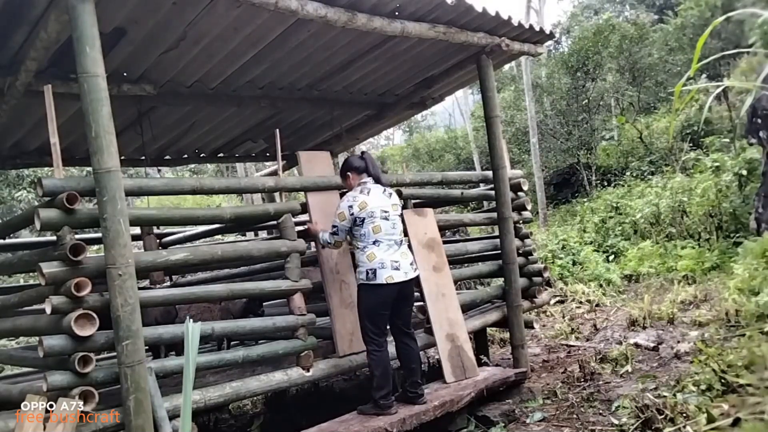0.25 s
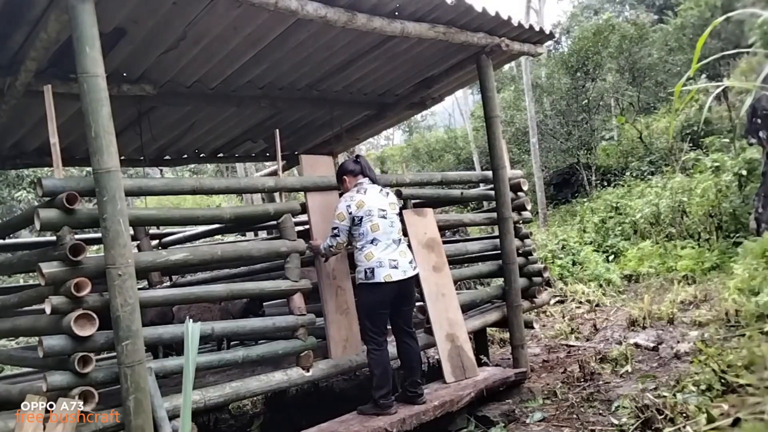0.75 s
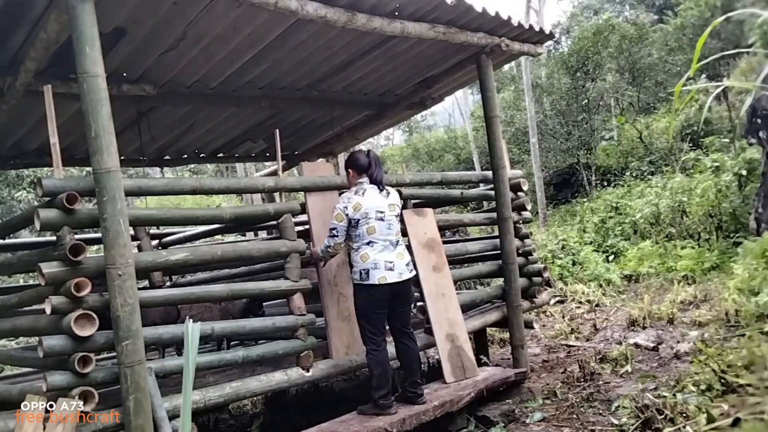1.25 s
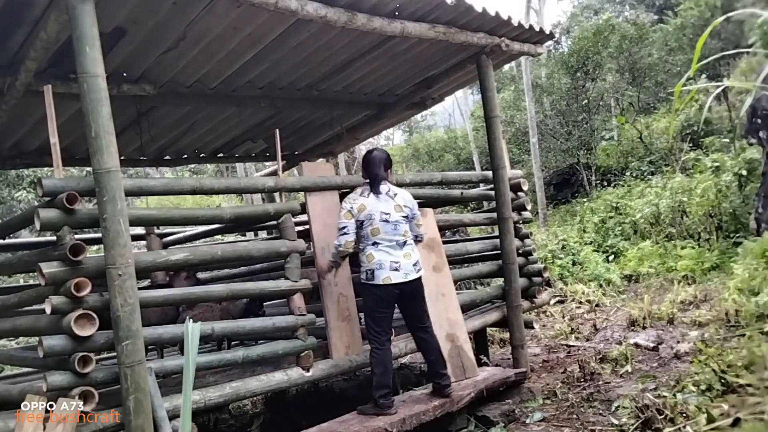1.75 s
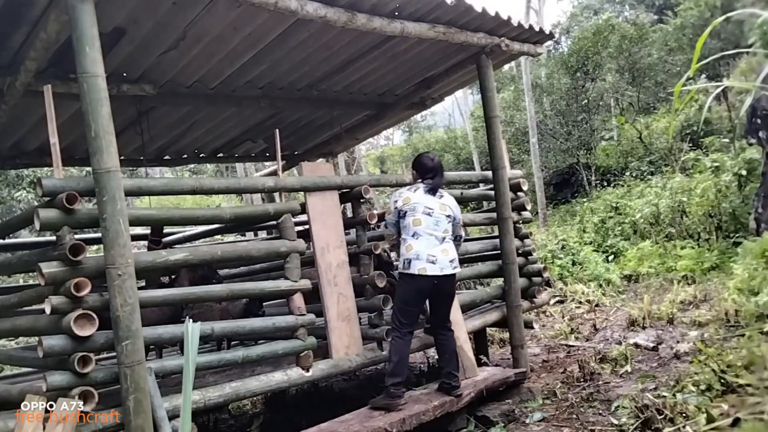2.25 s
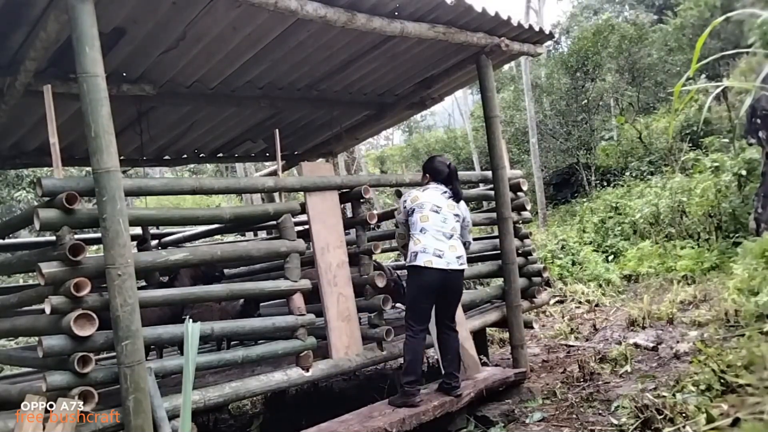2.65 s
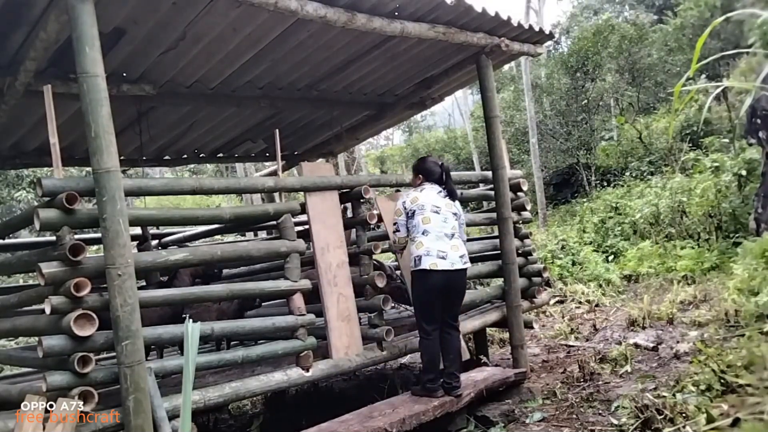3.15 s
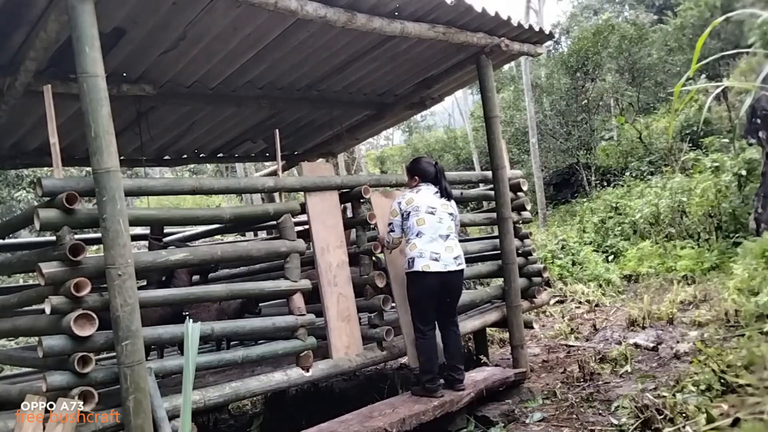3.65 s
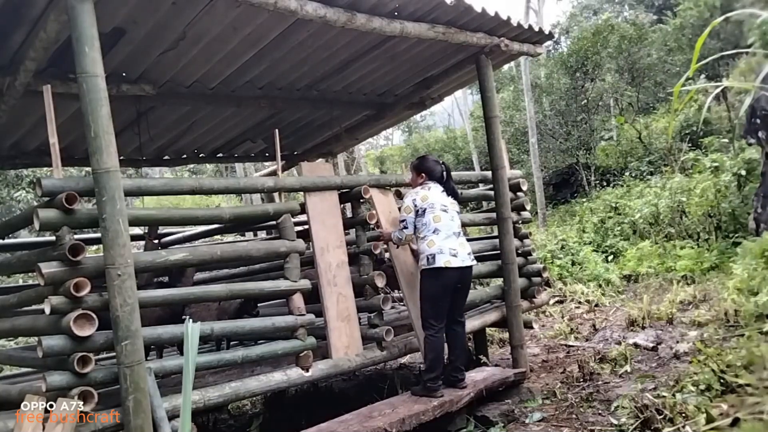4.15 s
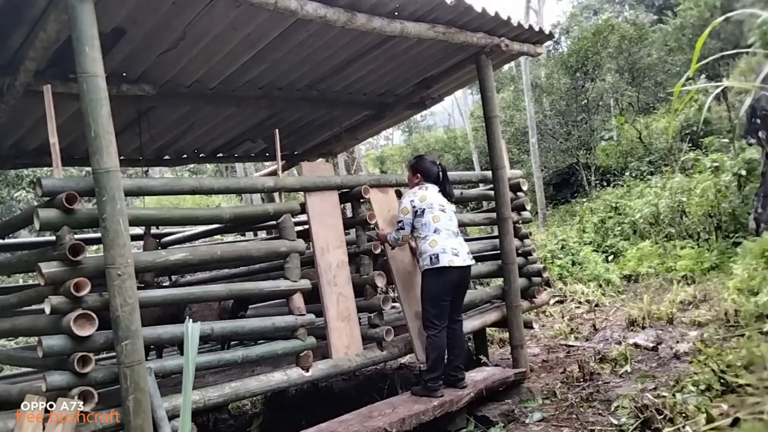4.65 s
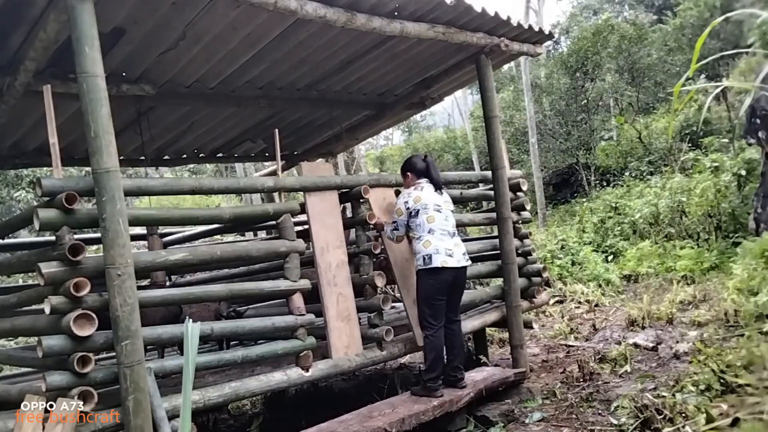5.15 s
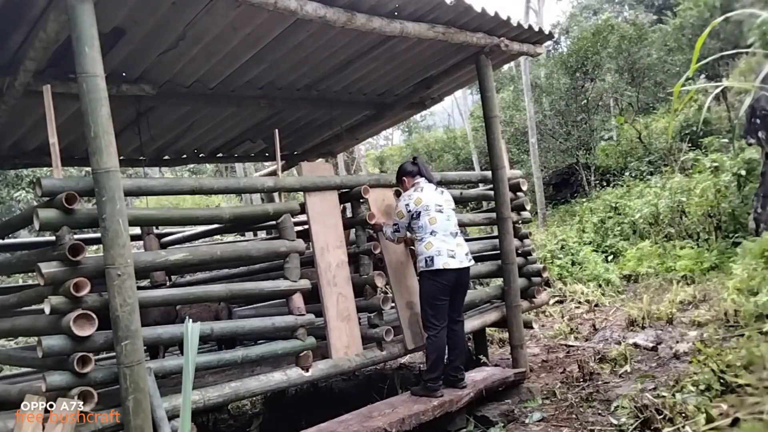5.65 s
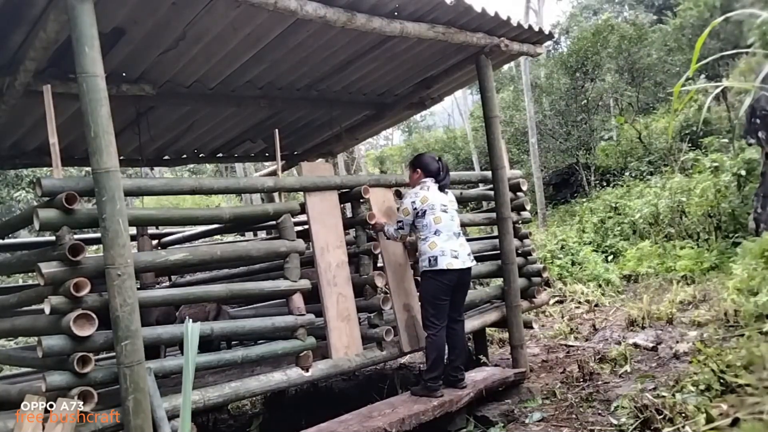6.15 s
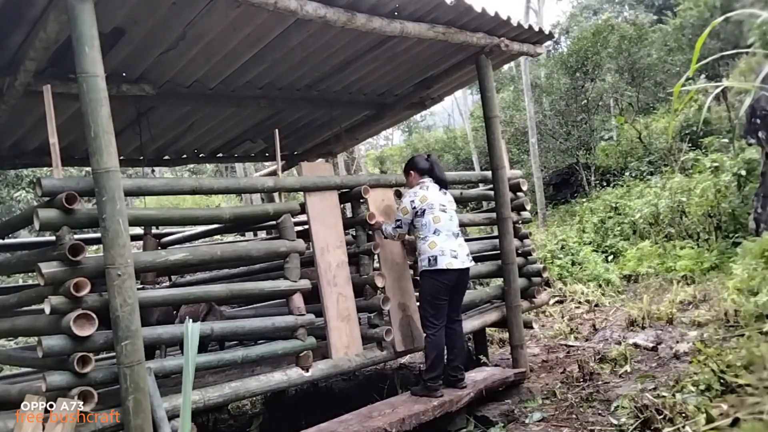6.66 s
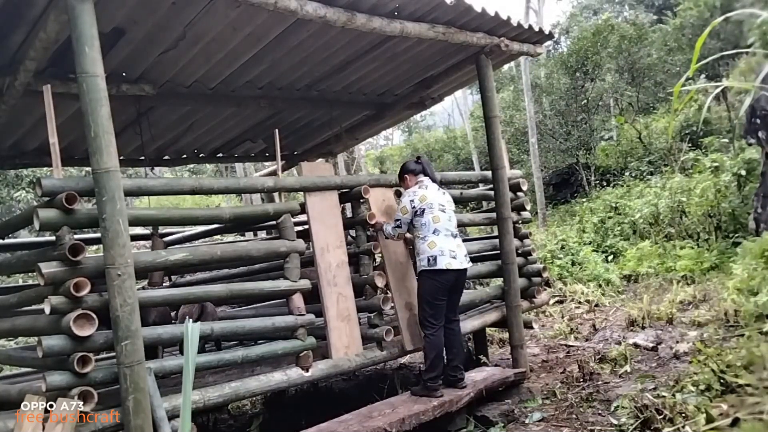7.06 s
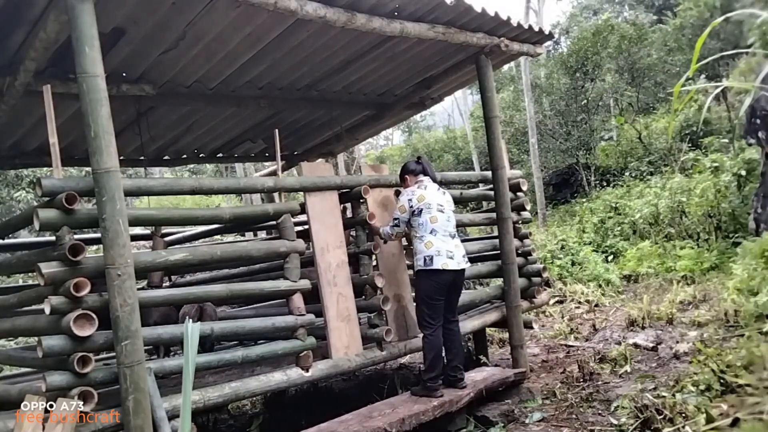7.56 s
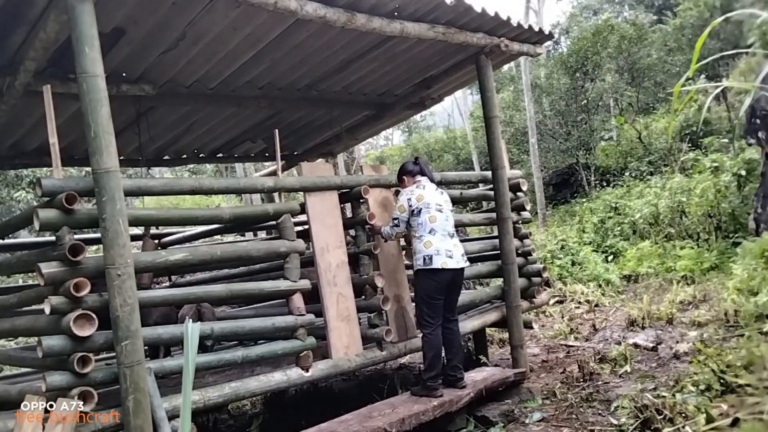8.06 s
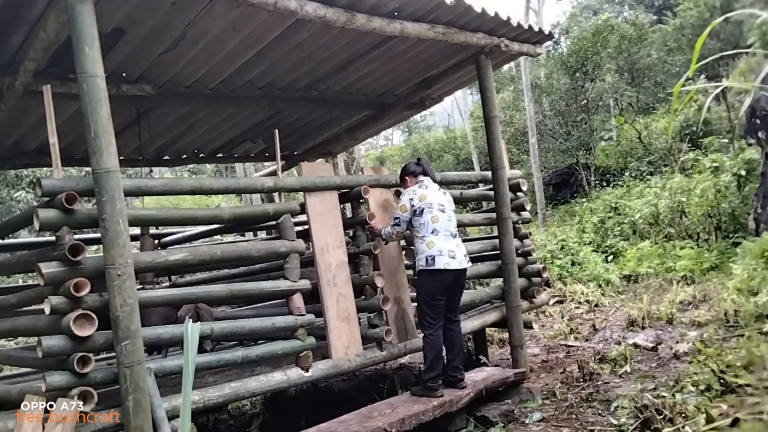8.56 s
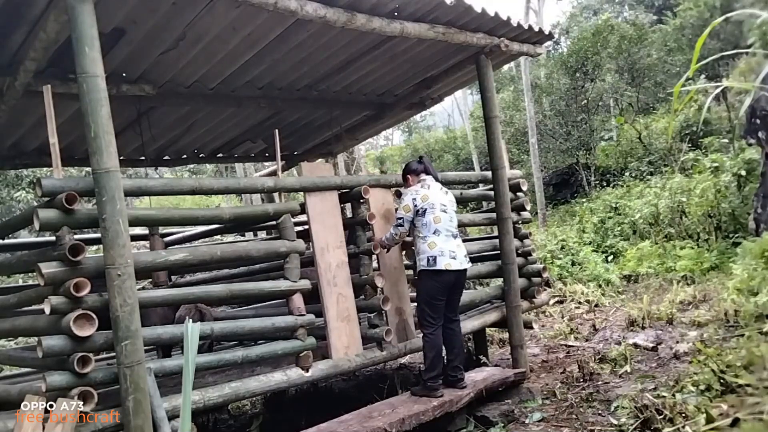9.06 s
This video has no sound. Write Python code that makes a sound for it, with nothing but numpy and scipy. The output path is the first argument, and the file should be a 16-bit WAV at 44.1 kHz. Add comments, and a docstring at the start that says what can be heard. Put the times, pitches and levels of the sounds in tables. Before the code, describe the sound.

A plank bangs hard on a hollow bamboo pen in a quick opening cluster, then near quiet with sparse light taps. Small metal animal bells clank around two to three and a half seconds. Moderate knocks return from about five seconds, busiest near six and a half, with a few lower bell notes after seven. Close stereo pickup outdoors under a sheet roof, very faint forest hush, momentary dropouts about three times a second.

```python
"""Wooden knocks come first, close by: planks lifted, slid and knocked against the poles of a bamboo goat pen,
each blow a noise burst through plank and hollow-pole resonators. Small metal bells on the goats' necks clank as
sums of decaying modes. Feet and clothes rustle in filtered noise under a sheet roof of feedback delays, at the
edge of a forest whose hush is faint shaped noise. Two close, unlike microphone ports pick it up, and the sound
cuts out for a moment about three times a second."""
import sys
import numpy as np
from scipy import signal
from scipy.fft import rfft, irfft, next_fast_len
from scipy.io import wavfile
from scipy.ndimage import uniform_filter1d

SR = 44100
rng = np.random.default_rng(int(sys.argv[2]) if len(sys.argv) > 2 else 0)


def to_linear_factor(level_db):
    """Convert decibel levels (scalar or array-like) to linear amplitude factors."""
    exponent = np.asarray(level_db, float) / 20
    return 10 ** exponent


def transcribe(u):
    """Save the signal u as a 16-bit wav file named by the first command-line argument.

    u: samples, shape (n,) or (channels, n), limited to [-1, 1]; the rate is SR.
    q: integer samples, one column per channel.
    """
    v = np.clip(np.atleast_2d(u).T, -1, 1)
    q = np.round(v * 32767).astype(np.int16)
    wavfile.write(sys.argv[1], SR, q)


N = 410130   # samples

# Wood on bamboo. Each row: start in seconds, body level in dB, crack level in dB, nominal t60 in seconds,
# centre in Hz.
KNOCKS = [(0.039, -12, -61, 0.12, 550), (0.045, -12, -31.5, 0.14, 587), (0.056, -21.5, -43.5, 0.1, 526),
          (0.1224, -12.5, -31, 0.08, 580), (.13, -14, -34, 0.1, 1030), (0.179, -28.5, -35, 0.2, 550),
          (0.423, -45, -52, 0.27, 980), (0.59, -38, -59, 0.13, 504), (0.797, -53.5, -56.5, 0.23, 542),
          (1.074, -38, -55, 0.27, 499), (1.231, -51, -60, 0.11, 1230), (1.657, -52.5, -54.5, 0.62, 796),
          (1.784, -63.5, -47, 0.3, 2060), (1.809, -37.5, -48.5, 0.36, 1024), (2.54, -50.5, -56, 0.33, 870),
          (2.763, -48, -95, 0.71, 1364), (2.813, -37, -51, 0.27, 1350), (2.913, -43.5, -50, 0.36, 1310),
          (3.528, -49, -57.5, 0.53, 507), (4.016, -51.5, -59.5, 0.16, 1363), (4.059, -51, -57, 0.37, 706),
          (4.236, -43.5, -50.5, 0.15, 1255), (4.561, -56, -65, 0.18, 630), (4.76, -49, -66, 0.18, 477),
          (4.909, -78, -63.5, 0.17, 980), (4.953, -31, -48, 0.19, 494), (5.278, -45.5, -62, 0.48, 947),
          (5.361, -26.5, -52.5, 0.2, 480), (5.529, -44, -69, 0.26, 593), (5.58, -30, -28.5, 0.09, 1730),
          (5.59, -26, -58, 0.13, 750), (6.292, -47.5, -58, 0.35, 465), (6.508, -38.5, -75, 0.13, 1370),
          (6.666, -30, -51.5, 0.17, 2080), (6.695, -39, -74, 0.072, 1900), (6.713, -26, -78, 0.1, 486),
          (6.725, -26.5, -77, 0.29, 460), (6.744, -28, -44, 0.14, 2750), (6.836, -44.5, -48.5, 0.54, 415),
          (7.189, -43, -70, 0.76, 370), (7.527, -31.5, -54.5, 0.13, 400), (7.639, -32.5, -64, 0.093, 408),
          (7.938, -40.5, -55, 0.56, 840), (8.202, -60, -56, 0.94, 796), (8.366, -45, -53, 0.15, 867),
          (8.595, -53, -66.5, 0.1, 428), (8.706, -49.5, -59.5, 0.12, 748), (8.818, -43, -60, 0.11, 1050),
          (8.909, -40, -67, 0.14, 446), (9.044, -42, -78, 0.31, 650), (9.134, -46.5, -59, .1, 3000),
          (9.152, -48, -51.5, 0.098, 1380), (9.272, -55, -56, 0.18, 900)]
# Modes of planks and poles. Each row: centre in Hz, width in Hz, level in dB.
WOOD = [(356.7, 42, 0), (465, 24, 3), (587, 41, 3), (765, 37, -1.5), (928, 60, 1), (1220, 320, -10.5),
        (1345, 56, 0.5), (1710, 600, -6.5), (2080, 420, -5.5), (2620, 260, -9.5), (3010, 260, -11.5)]
# Boom of the hollow poles. Each row: centre in Hz, width in Hz, level in dB.
HOLLOW = [(84, 32, -11), (128, 38, 0.5), (168.1, 36, 3), (197, 33, 4.5), (250, 76, -3)]
# Feet and hooves on the pole floor. Each row: start in seconds, level in dB, nominal t60 in seconds.
THUMPS = [(0.036, -24.5, 0.09), (1.076, -41, 0.076), (1.248, -40.5, 0.28), (1.783, -48, 0.24),
          (3.901, -63, 0.2), (6.304, -51, 0.26), (7.187, -38.5, 0.18), (7.527, -44, 0.26),
          (9.042, -39.5, 0.25)]
# Light scuffs heard only in the treble. Each row: start in seconds, level in dB, t60 in seconds.
SCUFFS = [(.798, -41.5, 0.1), (1.115, -45, 0.091), (3.714, -50, 0.18), (5.82, -42, 0.037),
          (5.874, -45.5, 0.18), (6.53, -46, 0.33), (6.851, -44, 0.11)]
# Clapper strokes on the small and the large bell. Each row: start in seconds, low height in dB, high height
# in dB, place on the rim in degrees, ring share of the free decay.
SMALL_STROKES = [(1.314, -24.5, -28, 105, 0.38), (1.83, -40.5, -41.5, 39, 0.55),
                 (2.207, -35.5, -87.5, 33, 0.1), (2.27, -24.5, -19, 34, 0.18),
                 (2.298, -16.5, -19.5, 47, 0.15), (2.483, -34.5, -38.5, 38, 0.24),
                 (2.508, -39, -32, 82, 0.2), (2.606, -44, -52, 45, 0.19), (2.781, -39, -50, 56, 0.33),
                 (2.835, -36.5, -27.5, 12, 0.46), (2.925, -50, -29, 26, 0.45),
                 (3.316, -41, -57.5, 46, 0.18), (3.491, -34.5, -22.5, 2.5, 0.25), (3.52, -46, -42, 11, 0.4),
                 (6.407, -32, -29, 5.5, 0.5), (6.731, -30, -26.5, 80, 0.36),
                 (9.058, -37.5, -32.5, 27, 0.41)]
LARGE_STROKES = [(.909, -43.5, -38, 42, 0.48), (7.292, -45.5, -21, 32.3, 0.68),
                 (7.41, -40, -24.5, 57, 0.91)]
# What drives each mode family. Each row: the low, high or greater (either) height, or the high height along or
# across the struck place; level in dB.
SMALL_DRIVE = [("low", 0), ("either", -20.5), ("high", -5.5), ("along", 0), ("across", 0), ("high", -10.5)]
LARGE_DRIVE = [("low", 0), ("low", -3.5), ("high", -7.5), ("along", 0), ("across", 0), ("high", -22),
               ("low", 2)]
# A small-bell stroke with other modes sounding, strokes on a tiny bell, a faint metallic squeak and a hollow
# pole left ringing. Each row: start in seconds, height in dB, ring share of the free decay.
OTHER_MODES_STROKES = [(6.865, -37, 0.98)]
TINY_STROKES = [(6.308, -54, 1), (6.337, -36.5, 0.72)]
SQUEAK_STROKES = [(2.44, -48.5, 0.5), (6.335, -51, 0.85)]
POLE_STROKES = [(7.995, -49, 0.88)]
# Modes of each ringing thing, one list a family. Each row: pitch in Hz, level in dB, free t60 in seconds.
SMALL_BELL = [
    [(1427, -2, 1.3), (1385, -2, .3)],
    [(3790, 0, .5), (3720, -3, .4)],
    [(7063, 0, .34), (11350, -5, .24), (11700, -5, .24), (14560, -5, .26), (15600, -14, .2)],
    [(8545, -1, .34), (8475, -8, .18), (13310, -17, .25)],
    [(9190, 0, .36), (9305, -9, .28), (12960, -11, .2)],
    [(9635, -2, .3), (9800, -3, .3)],
]
LARGE_BELL = [
    [(759, -1, 1.15), (955, -2, .1)],
    [(2056, -2, .75), (5066, 3.5, .42)],
    [(5631, 0, .24), (5819, -1, .24), (6185, -8, .2), (7779, -10, .15), (11340, -12, .2)],
    [(7437, 0, .22), (7224, -6, .17), (8290, -5, .22), (8760, -5, .18), (12800, -2, .11), (14720, -1, .09),
     (14250, -10, .17), (15150, -9, .18)],
    [(9884, 0, .15), (9324, -10, .13), (10420, -6, .13), (12370, -4, .15), (13100, -3, .1),
     (11820, -9, .12), (10940, -12, .15)],
    [(3860, 1, .5), (3290, -4, .2), (2660, -5, .14), (6810, 2, .12)],
    [(9065, 0, .2), (8790, -1, .2)],
]
SMALL_BELL_OTHER_MODES = [
    [(7144, -2, .3), (7181, -2, .25), (3833, -12, .3), (1427, -21, .9), (8936, -11, .2), (9119, -15, .25),
     (9636, -10, .25), (9760, -5, .25), (11480, -10, .15), (13870, -13, .2)],
]
TINY_BELL = [
    [(9168, 0, .14), (6772, -10, .17), (7181, -11, .15), (14230, -13, .08), (14780, -15, .1),
     (11260, -14, .15), (13300, -12, .1)],
]
SQUEAK = [
    [(2480, 0, .2), (5830, -8, .25)],
]
POLE = [
    [(468, -2, 0.6), (600, -6, .25), (877, -8, 0.37)],
]
# Shuffling and sliding. Each row: time in seconds, low rub level in dB, bright rustle level in dB.
RUSTLE = [(0.058, -26.5, -37), (0.16, -52, -63), (0.6, -70, -70.5), (1.27, -60, -62.5), (1.52, -74, -73.5),
          (2.79, -70.5, -67.5), (3.943, -75.5, -79), (4.1, -75, -70), (4.56, -80, -83),
          (5.31, -64.5, -68.5), (5.52, -54.5, -60), (5.67, -69, -66.5), (6.03, -74.5, -82),
          (6.289, -79, -73), (6.491, -69, -59.5), (6.848, -59, -89), (6.98, -65.5, -76.5),
          (7.24, -72.5, -65), (7.39, -62, -56.5), (7.52, -57, -70.5), (7.729, -72.5, -70.5),
          (8.191, -69.5, -68), (8.48, -78.5, -79), (9.02, -70.5, -67), (9.3, -65.5, -63.5)]
# Noise spectra of rub, bright rustle and forest hush. Each row: frequency in Hz, relative level in dB per Hz.
RUB = [(70, -38.5), (125, 1), (200, -3.5), (500, -5.5), (1000, -6.5), (2000, -30.5), (4000, -39.5)]
BRIGHT = [(500, -36.5), (1200, -1.5), (2500, 2), (4000, 3), (6000, -2), (9000, 4), (15500, -7.5)]
HUSH = [(25, -6), (60, -6), (350, -15.5), (1000, -18), (2300, -25), (4000, -17), (9000, -38), (15500, -26)]
# Likeness of the two sides in the noises. Each row: frequency in Hz, left-right likeness from 0 to 1.
LIKENESS = [(30, 1), (100, 1), (500, 0.62), (1400, 0.43), (3100, 0), (6800, 0.075), (15000, 0)]
# Colour of the microphone ports, left list then right. Each row: centre in Hz, width in Hz, gain in dB.
PORTS = [
    [(7500, 6000, -11), (12800, 2500, 4), (15500, 2000, -6)],
    [(9000, 2200, 15), (6000, 3000, 4), (3800, 500, 3), (14000, 4000, 3), (15300, 1500, 4)],
]
# Steady offset. Each row: share of full scale, left then right.
OFFSET = [
    [.00022],
    [.00034],
]
# Runs of evenly spaced dropouts. Each row: first start in seconds, spacing in seconds, count, length in seconds.
DROPOUTS = [(.009, .3395, 3, .0187), (1.0262, .0758, 2, .0117), (1.3703, .3411, 9, .0197),
            (4.4375, .337, 6, .016), (6.2233, 0, 1, .015), (6.4745, .3411, 3, .022),
            (7.5025, .3383, 6, .0182)]

BLOW_T = np.arange(SR // 2) / SR   # s, time within one blow
BLOW_SPREAD_DB, BLOW_DETUNE, CHATTER_DB = 2.5, 0.04, 4.5   # each blow meets other modes; the contact chatters
SNAP_DB, SNAP_S = 7.5, 0.0016   # first contact over the tail for a hard blow; its decay constant
PUSH_DB, PUSH_CYCLES = -4.5, 9.0   # a hard blow's swing at its centre pitch; cycles to fall 60 dB
FOCUS_DB = 7   # fall per octave off the centre of a blow
THUD_DB, THUD_FALL_DB = -13, 5   # boom of the poles under a deep blow; its fall per octave of a higher centre
SCUFF_CUT_HZ, SCUFF_RISE_S = 5800, 0.0015
BASS_CUT_HZ = 100   # the hollow poles radiate little below this
BELL_SWELL_S, BELL_SPREAD_DB = 0.009, 1.5   # rise constant; chance level spread of each side
FLUTTER_DB = 4.5   # spread for the higher modes
RATTLE, RATTLE_S = 0.7, 0.05   # share and decay constant of the clapper's rattle on the metal
CLANK_DB, LARGE_CLANK_DB = -10, -19   # grain of the clapper's contact
LARGE_ROUGH = 0.7   # the large bell rings cleaner: its share of rattle and flutter
TICKS_PER_S, TICK_DB = 44, -5.5   # random ticks of wood; their rms over the low rub
ROOF_T60_S, ROOF_DB = 0.25, -16
HUSH_DB = -76   # rms ahead of the ports
RIGHT_LAG, DROPOUT_FADE = 4, 60   # samples
CUTOFF_HZ = 16200


def near_noise():
    """Contact noise of a close blow, almost alike on both sides."""
    middle = rng.standard_normal(len(BLOW_T))
    return middle + [[.12], [-.12]] * rng.standard_normal(len(BLOW_T))


def softness(t60):
    """A long contact is soft: it starts slowly and hardly snaps."""
    return max(t60, .08) / .1


def dying(level_db, t60, slower, rise_s):
    """Envelope of a blow: a rise slowed by softness and an exponential fall."""
    fall = to_linear_factor(level_db - 60 * BLOW_T / (max(t60, .03) * slower))
    return fall * (1 - np.exp(-BLOW_T / (rise_s * softness(t60) ** 2)))


def thud(level_db, t60):
    """The hollow poles boom: a slow push of noise through their low resonances."""
    push = near_noise()
    boom = resonances(push * dying(level_db, t60, 1.1, .0052), HOLLOW)
    return boom / np.std(resonances(push[0], HOLLOW))


def blow_modes(centre_hz):
    """Plank modes met by one blow: shifted by chance, strongest near the centre of the blow."""
    modes = []
    for hz, width_hz, level_db in WOOD:
        shift, luck = rng.standard_normal(2)
        off_centre = abs(np.log2(hz / centre_hz))   # octaves
        level_db = level_db + BLOW_SPREAD_DB * luck - FOCUS_DB * off_centre
        modes.append((hz * (1 + BLOW_DETUNE * shift), width_hz, level_db))
    return modes


def contact_snap(t60):
    """Wood meeting wood: a strong first contact, then a chattering tail."""
    snap = 1 + to_linear_factor(SNAP_DB) / softness(t60) ** 4 * np.exp(-BLOW_T / SNAP_S)
    knots = BLOW_T[::180]
    chatter = np.interp(BLOW_T, knots, rng.standard_normal(len(knots)))
    return snap * to_linear_factor(CHATTER_DB * chatter * np.minimum(BLOW_T / .01, 1))


def crack(level_db, t60, snap):
    """Bright splitting edge of a blow: uneven contact grains, high-passed."""
    def bright(x):
        high = signal.butter(2, 1100, "high", fs=SR, output="sos")
        return signal.lfilter([1], [1, -.5], signal.sosfilt(high, x))

    size = to_linear_factor(.89 * np.minimum(rng.exponential(1, len(BLOW_T)), 4))
    grains = rng.standard_normal((2, len(BLOW_T))) * size
    sound = bright(grains * snap * dying(level_db, t60, .8, .0008))
    return sound / band_rms(bright(grains), 2500, 6000)


def knocks():
    """A snapping noise burst drives the plank modes, joined by a short swing at the blow's centre pitch, over a
    bright crack and a pole thud."""
    out = np.zeros((2, N))
    for s, body_db, crack_db, t60, centre_hz in KNOCKS:
        contact, snap, modes = near_noise(), contact_snap(t60), blow_modes(centre_hz)
        push = to_linear_factor(body_db + PUSH_DB - 60 * BLOW_T * centre_hz / PUSH_CYCLES)
        push = push / softness(t60) ** 4 * np.sin(2 * np.pi * centre_hz * BLOW_T)
        body = resonances(contact * snap * dying(body_db - 5, t60, .61, .0014), modes)
        body = body / np.std(resonances(contact[0], modes))
        thud_db = body_db + THUD_DB - THUD_FALL_DB * np.log2(centre_hz / WOOD[0][0])
        add(out, s, push + body + crack(crack_db, t60, snap) + thud(thud_db, t60))
    return out


def thumps():
    """Feet and hooves set the hollow poles of the floor booming."""
    out = np.zeros((2, N))
    for s, level_db, t60 in THUMPS:
        add(out, s, thud(level_db, t60))
    return out


def scuffs():
    """Light scuffs: thin high-passed noise with a quick rise and an exponential fall."""
    out = np.zeros((2, N))
    thin = signal.butter(3, SCUFF_CUT_HZ, "high", fs=SR, output="sos")
    for s, level_db, t60 in SCUFFS:
        noise = signal.sosfilt(thin, rng.standard_normal((2, len(BLOW_T))))
        fall = to_linear_factor(level_db - 60 * BLOW_T / max(t60, .02))
        add(out, s, noise * fall * (1 - np.exp(-BLOW_T / SCUFF_RISE_S)))
    return out


def strokes_of(rows, families):
    """Height of each family from a stroke's two heights; paired families share by the struck place."""
    out = []
    for s, low_db, high_db, place, ring in rows:
        angle = np.radians(place)
        along_db, across_db = 20 * np.log10(np.abs([np.cos(angle), np.sin(angle)]) + 1e-3)
        drive = dict(low=low_db, either=max(low_db, high_db), high=high_db,
                     along=high_db + along_db, across=high_db + across_db)
        out.append((s, *[drive[name] + db for name, db in families], ring))
    return out


def ringing_mode(hz, level_db, t60, ring, rough):
    """One decaying mode: rattle roughens its start, and it flutters as the bell swings."""
    damped = t60 * max(ring, .1) ** (1 + 1200 / hz)   # resting on the neck kills low modes most
    t = np.arange(min(SR, int(damped * SR))) / SR
    swing_s, rattle_s = np.arange(0, 1.02, .016), np.arange(0, 1.01, .003)
    shared, left, right, phase = rng.standard_normal(4)
    shaken = rough * np.clip(hz / 5000, .7, 1)   # low modes stay steadier
    flutter_db = FLUTTER_DB * shaken * np.interp(t, swing_s, rng.standard_normal(len(swing_s)))
    rattle = RATTLE * shaken * np.exp(-t / RATTLE_S)
    along, across = [rattle * np.interp(t, rattle_s, v) for v in rng.standard_normal((2, len(rattle_s)))]
    size = to_linear_factor(level_db + flutter_db - 60 * t / damped)
    sides = to_linear_factor(BELL_SPREAD_DB * np.array([[left], [right]]))
    turn = 2 * np.pi * hz * t + 2 * shared + np.array([[0], [phase * hz / 4500]])
    return size * sides * ((1 + along) * np.sin(turn) + across * np.cos(turn))


def struck_ring(strokes, families, clank_db=CLANK_DB, rough=1):
    """Each stroke sets every mode ringing, under a short grainy clank of contact."""
    out, t = np.zeros((2, N)), np.arange(SR) / SR
    for s, *heights_db, ring in strokes:
        sound = np.zeros((2, SR))
        for height_db, family in zip(heights_db, families):
            for hz, level_db, t60 in family:
                mode = ringing_mode(hz, height_db + level_db, t60, ring, rough)
                sound[:, :mode.shape[1]] += mode
        contact_db = heights_db[:6][-1]   # the sixth family's height, or the last if there are fewer
        grain = rms_one(signal.lfilter([1, -1], [1, -.5], rng.laplace(size=(2, SR))))
        clank = to_linear_factor(contact_db + clank_db - 60 * t / .18) * grain
        add(out, s, (sound + clank) * (1 - np.exp(-t / BELL_SWELL_S)))
    return out


def bells():
    """Metal bells, small, large and tiny, ring in sums of decaying modes."""
    small = struck_ring(strokes_of(SMALL_STROKES, SMALL_DRIVE), SMALL_BELL)
    small = small + struck_ring(OTHER_MODES_STROKES, SMALL_BELL_OTHER_MODES)
    large = struck_ring(strokes_of(LARGE_STROKES, LARGE_DRIVE), LARGE_BELL, LARGE_CLANK_DB, LARGE_ROUGH)
    tiny = struck_ring(TINY_STROKES, TINY_BELL)
    return small + large + tiny


def pole_ring():
    """A hollow pole left ringing in a few low modes."""
    return struck_ring(POLE_STROKES, POLE)


def squeak():
    """A faint metallic squeak of two short modes."""
    return struck_ring(SQUEAK_STROKES, SQUEAK)


def rustle():
    """Shuffling feet and clothes: a low rub with wooden ticks and a bright rustle, both noises flickering."""
    s, rub_db, bright_db = np.transpose(RUSTLE)
    # still before the first blow
    s, rub_db, bright_db = np.r_[.03, s], np.r_[-75, rub_db], np.r_[-75, bright_db]
    t = np.arange(N) / SR
    rub, bright = coloured(RUB, patchy_db=1.5), coloured(BRIGHT, patchy_db=1.8)
    tick_size = to_linear_factor(3.5 * np.minimum(rng.exponential(1, N), 3))
    ticks = (rng.random(N) < TICKS_PER_S / SR) * tick_size + 1e-18
    ticks = to_linear_factor(TICK_DB) * rms_one(resonances(ticks, WOOD))
    low = to_linear_factor(np.interp(t, s, rub_db)) * (rub / band_rms(rub, 150, 1200) + ticks)
    return low + to_linear_factor(np.interp(t, s, bright_db)) * bright / band_rms(bright, 2500, 6000)


def roof(x):
    """Sound bounces between roof, ground and poles: six feedback delays a side."""
    size = next_fast_len(N + SR // 2)
    turn = -2j * np.pi * np.arange(size // 2 + 1) * SR / size
    lags = np.array([[.0071, .0093, .0118, .0139, .0167, .0197],
                     [.0077, .0101, .0111, .0147, .0157, .0211]])   # s, left then right
    response = np.zeros((2, len(turn)), complex)
    for k, lag in enumerate(lags.T):
        loop = to_linear_factor(-60 * lag[:, None] / ROOF_T60_S) * np.exp(turn * lag[:, None])
        response += (-1) ** k * loop / (1 - loop)
    echo = irfft(rfft(x, size) * response, size)[:, :N]
    # long waves reach the two close ports alike: the echoes differ only in the treble
    middle = echo.mean(axis=0)
    apart = signal.sosfilt(signal.butter(2, 1200, "high", fs=SR, output="sos"), echo - middle)
    return to_linear_factor(ROOF_DB) * (middle + apart)


def hush():
    """Faint forest hush: steady noise shaped in half-octave bands."""
    return to_linear_factor(HUSH_DB) * rms_one(coloured(HUSH, patchy_db=0))


def coloured(spectrum, patchy_db):
    """Half-octave bands of stereo noise, each with its own level, flicker and likeness."""
    out, together, edges = 0, drift(22), 22 * 2 ** np.arange(0, 9.6, .5)
    white = rng.standard_normal((2, 2, N))
    for k, (low, high) in enumerate(zip(edges, edges[1:])):
        band = signal.butter(2, [low, high], "band", fs=SR, output="sos")
        mid, side = signal.sosfilt(band, white[k % 2])
        hz = np.sqrt(low * high)
        alike = np.clip(at_hz(LIKENESS, hz), 0, 1)
        gain = to_linear_factor(at_hz(spectrum, hz) + patchy_db * (together + 1.4 * drift(10)))
        out = out + gain * (np.sqrt(1 + alike) * mid + np.sqrt(1 - alike) * side * [[1], [-1]])
    return out


def drift(rate):
    """Slow chance of spread 1: low-passed noise made at every 40th sample."""
    r = np.exp(-80 * np.pi * rate / SR)
    slow = signal.lfilter([1], [1, -2 * r, r * r], rng.standard_normal(N // 40 + 2002))[2000:]
    return np.interp(np.arange(N) / 40, np.arange(len(slow)), rms_one(slow))


def resonance(x, hz, width_hz):
    """One resonator, gain 1 on top."""
    r = np.exp(-np.pi * width_hz / SR)
    poles = [1, -2 * r * np.cos(2 * np.pi * hz / SR), r * r]
    return signal.lfilter([(1 - r * r) / 2, 0, (r * r - 1) / 2], poles, x)


def resonances(x, modes):
    """Parallel resonators with alternating signs."""
    return sum((-1) ** k * to_linear_factor(level_db) * resonance(x, hz, width_hz)
               for k, (hz, width_hz, level_db) in enumerate(modes))


def peak(x, hz, width_hz, gain_db):
    """A bell-shaped boost or cut."""
    g, w, a = to_linear_factor(gain_db / 2), 2 * np.pi * hz / SR, np.tan(np.pi * width_hz / SR)
    middle = -2 * np.cos(w)
    return signal.lfilter([1 + a * g, middle, 1 - a * g], [1 + a / g, middle, 1 - a / g], x)


def rms_one(x):
    """Scale to unit rms."""
    return x / np.sqrt(np.mean(x ** 2) + 1e-20)


def band_rms(x, low_hz, high_hz):
    """Rms of one band on the left, within the first second."""
    band = signal.butter(2, [low_hz, high_hz], "band", fs=SR, output="sos")
    return np.std(signal.sosfilt(band, x[0, :SR]))


def at_hz(points, hz):
    """Read a (Hz, value) table on a log axis."""
    return np.interp(np.log(hz), np.log(np.array(points)[:, 0]), np.array(points)[:, 1])


def add(out, s, sound):
    """Mix a sound in at a time."""
    at = round(s * SR)
    out[..., at:at + sound.shape[-1]] += sound[..., :N - at]


def scene():
    """Knocks, feet and bells under the roof, rustle and hush around them."""
    bass_cut = signal.butter(2, BASS_CUT_HZ, "high", fs=SR, output="sos")
    wood = signal.sosfilt(bass_cut, knocks() + thumps() + scuffs())
    struck = wood + bells() + pole_ring() + squeak()
    return struck + roof(struck) + rustle() + hush()


def low_pass(x):
    """Removes everything above the highest recorded frequency."""
    return signal.sosfilt(signal.butter(12, 16800, fs=SR, output="sos"), x)


def record(dry):
    """Each port colours its side, the top is cut, a small steady offset is added, all drops out briefly."""
    out = dry.copy()
    for side, colours in enumerate(PORTS):
        for hz, width_hz, gain_db in colours:
            out[side] = peak(out[side], hz, width_hz, gain_db)
    out[1] = np.roll(out[1], RIGHT_LAG)
    out = signal.sosfilt(signal.cheby2(12, 50, CUTOFF_HZ, fs=SR, output="sos"), out) + OFFSET
    gate = np.ones(N)
    for first, spacing, count, length in DROPOUTS:
        for s in first + spacing * np.arange(count):
            gate[round(s * SR):round((s + length) * SR)] = 0
    return low_pass(out * uniform_filter1d(gate, size=DROPOUT_FADE))


dry = scene()
out = record(dry)
transcribe(out)
```